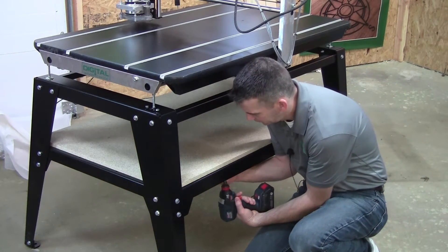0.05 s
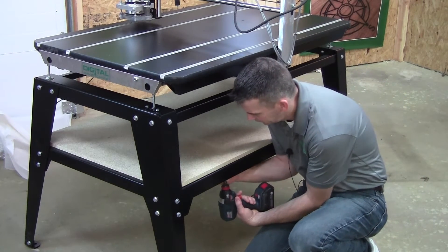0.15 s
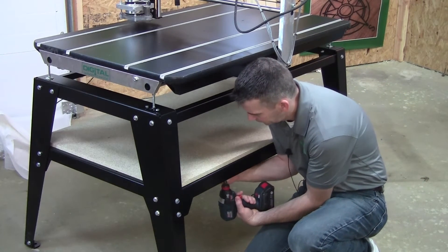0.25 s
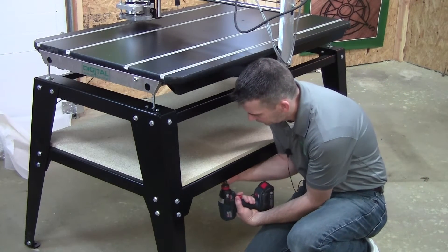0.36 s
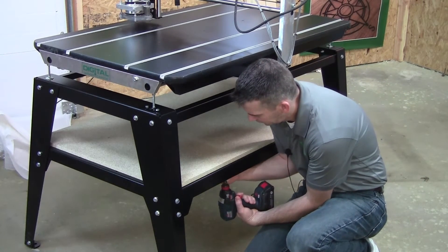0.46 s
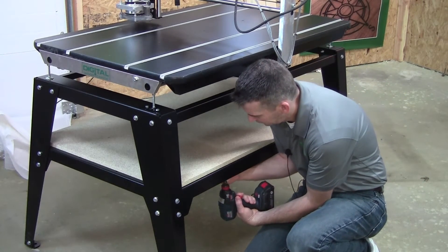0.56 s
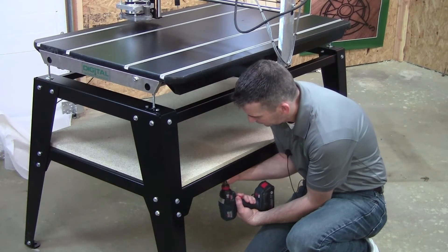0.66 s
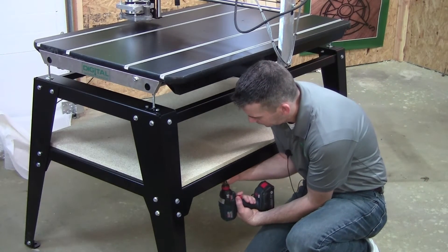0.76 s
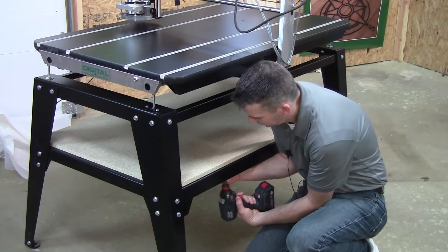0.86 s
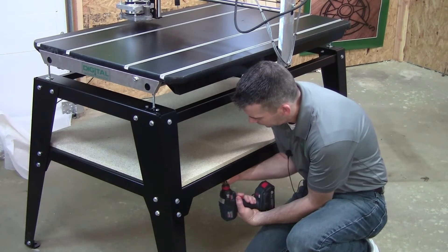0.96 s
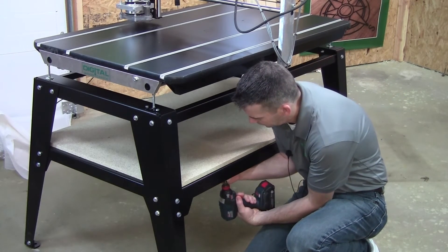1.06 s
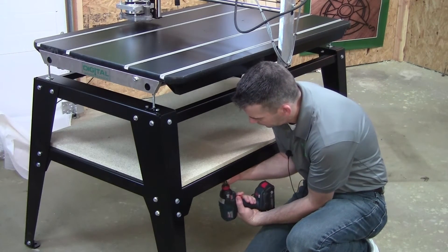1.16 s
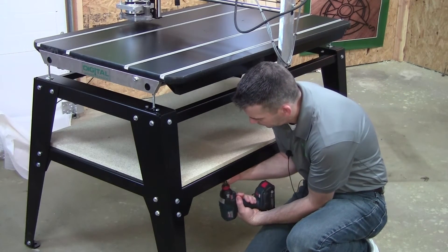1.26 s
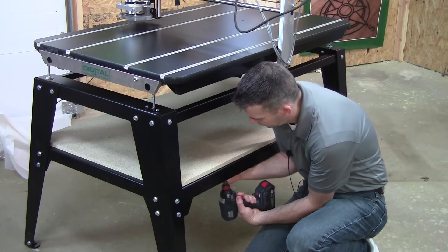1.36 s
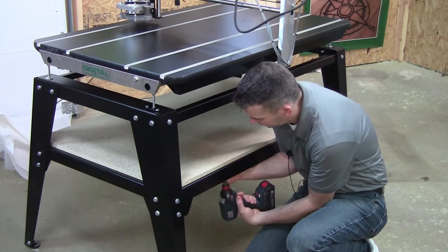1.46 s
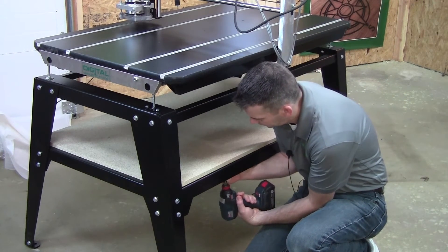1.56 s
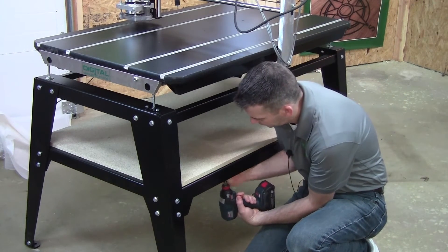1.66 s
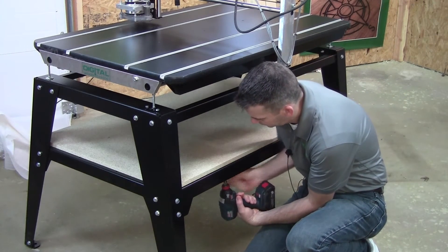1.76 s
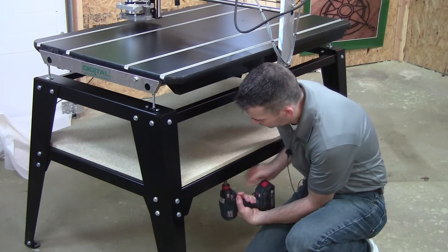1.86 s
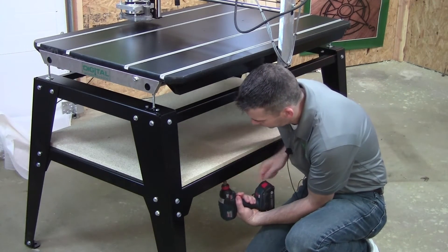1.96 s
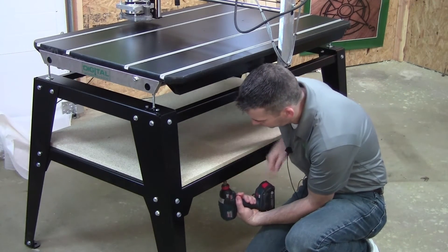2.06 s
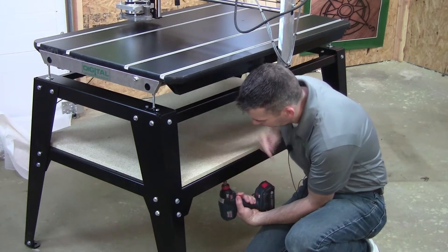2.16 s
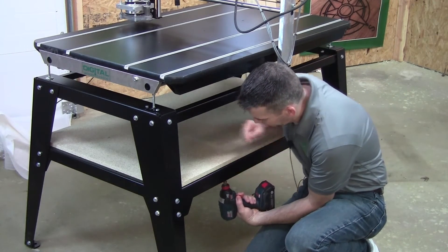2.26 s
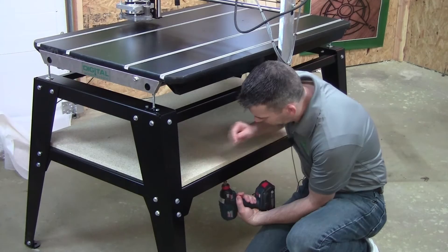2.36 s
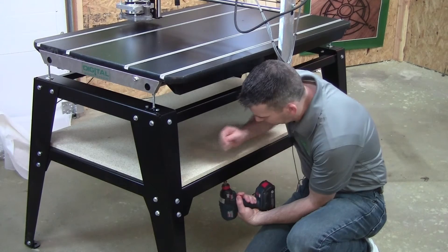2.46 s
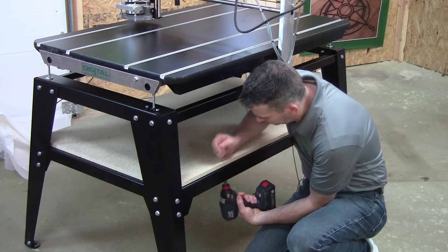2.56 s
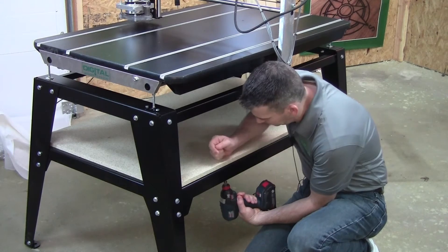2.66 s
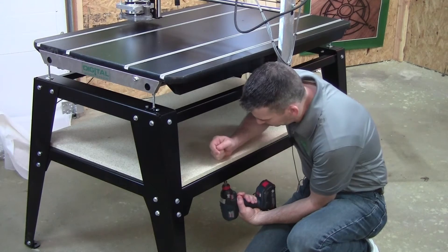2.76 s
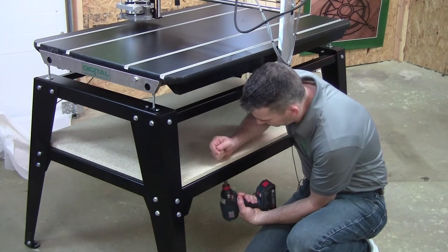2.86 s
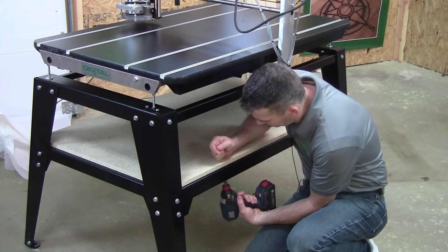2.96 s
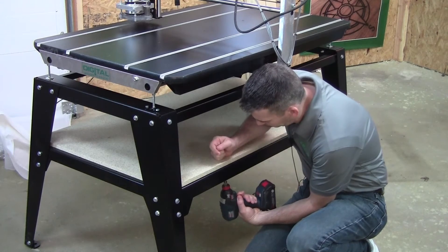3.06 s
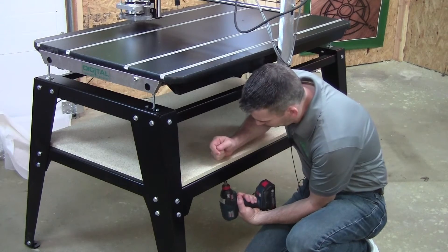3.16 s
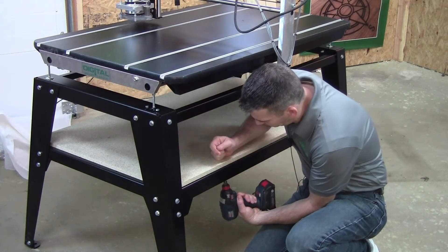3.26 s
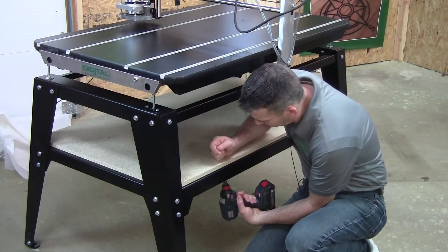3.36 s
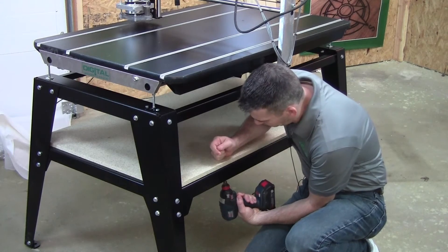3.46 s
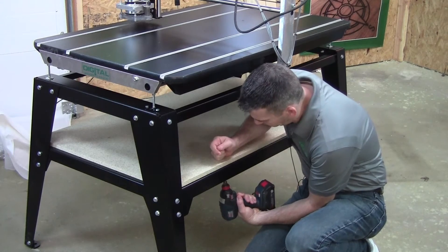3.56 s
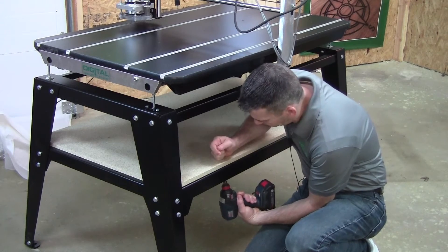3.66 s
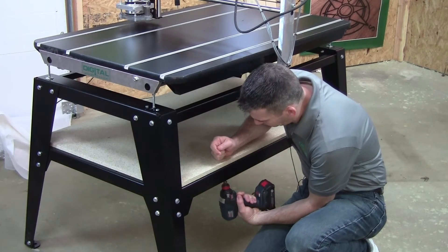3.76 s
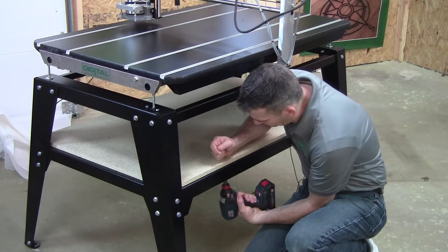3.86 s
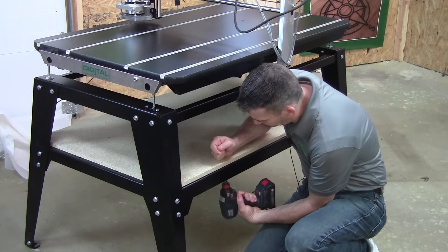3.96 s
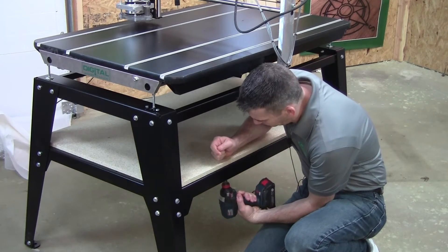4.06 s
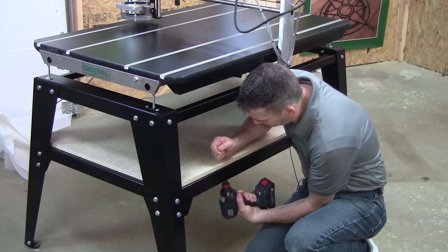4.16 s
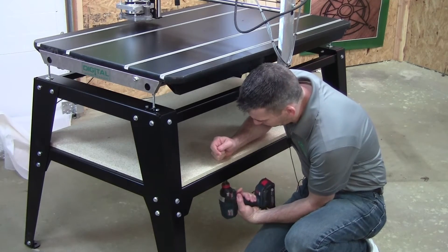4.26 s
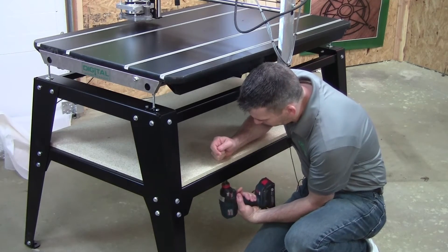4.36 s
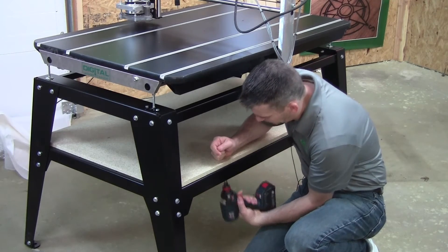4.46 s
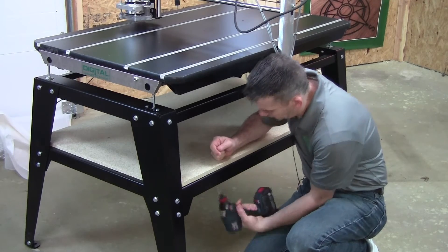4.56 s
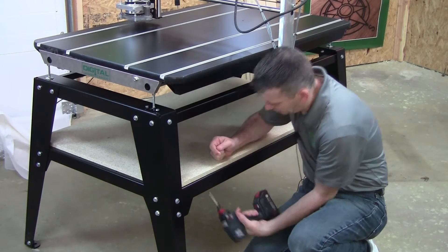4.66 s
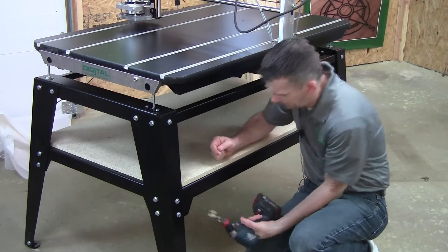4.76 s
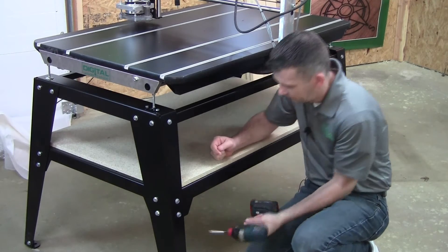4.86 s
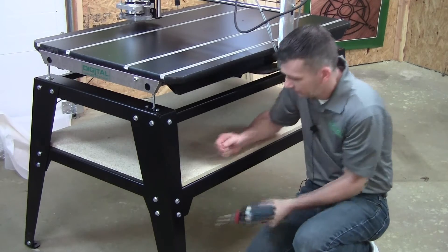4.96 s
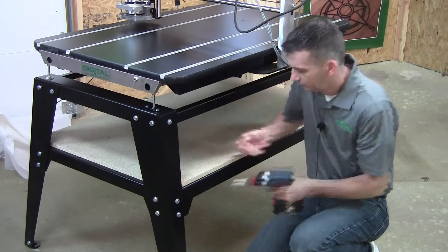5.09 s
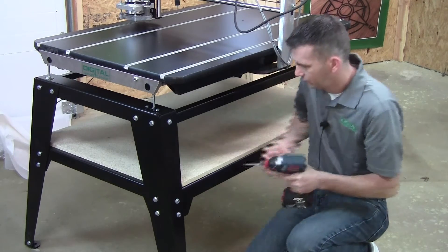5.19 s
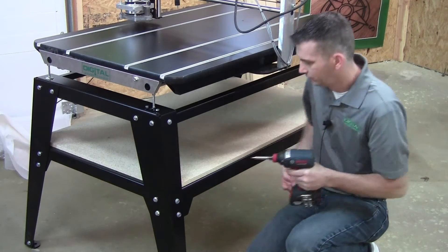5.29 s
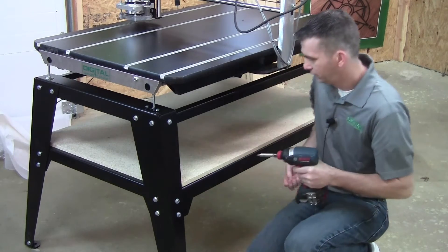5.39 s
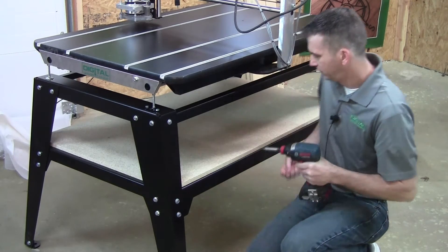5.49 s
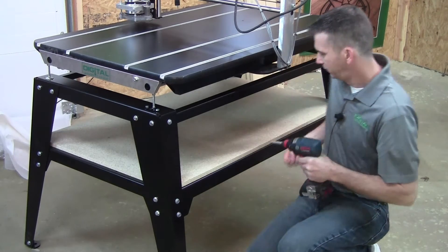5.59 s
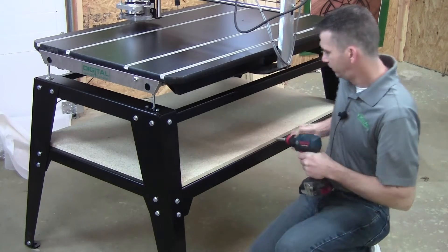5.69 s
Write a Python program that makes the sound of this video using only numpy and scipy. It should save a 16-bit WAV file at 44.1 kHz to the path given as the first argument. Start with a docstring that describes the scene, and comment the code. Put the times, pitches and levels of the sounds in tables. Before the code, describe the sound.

Faint low room air and slight shuffling, then a power driver pulses three times, its gear whine jumping up and stopping quickly. Gritty scraping and dull body bumps fill the gap. Four stronger pulses buzz through board and steel stand, ending in a burst of hard cracks. Clothing rubs and faint clicks remain, heard close up with a modest echo.

```python
"""Low bumps and soft shuffling come first, made of swelling noise over faint air in a hard-floored workshop.
Then a cordless screw gun is pulsed seven times under a plywood shelf on a steel stand: tooth harmonics whine,
noise rattles through the housing and shakes the board's modes, and the last run stalls into hammer blows.
Noise bursts make the knocks and scrapes, paired pulses the dull jolts, bright noise the rubbing cloth.
A clip-on microphone hears it all; a decaying noise tail gives the work its echo."""
import sys
import numpy as np
from scipy import signal
from scipy.fft import rfft, irfft
from scipy.io import wavfile

SR = 44100
rng = np.random.default_rng(int(sys.argv[2]) if len(sys.argv) > 2 else 0)


def log_audio(samples):
    """Write samples as a 16-bit WAV file to the path given in sys.argv[1]."""
    # one column per channel
    frames = np.atleast_2d(samples).T
    # limit to full scale, then quantise
    limited = np.clip(frames, -1, 1)
    pcm = np.round(limited * 32767).astype(np.int16)
    wavfile.write(sys.argv[1], SR, pcm)


N = 252680   # samples

# Air in the room, noise spectrum: f/Hz, density/dB per Hz
AIR_SPECTRUM = [(15, -31), (25, 6), (53, -2.5), (170, -7), (734, -22), (1260, -29.5), (6740, -37.5),
                (9320, -40), (14800, -41.5), (16000, -43)]
# Echo decay of the workshop: f/Hz, t60/s
SHOP_DECAY = [(100, 0.86), (400, 0.49), (2500, 0.36), (8000, 0.28), (16000, 0.068)]
# Low bumps and shudder, noise spectrum: f/Hz, density/dB per Hz
BUMP_SPECTRUM = [(12, -50.5), (20, -1), (80, -5), (134, -9), (255, -19.5), (311, -24), (400, -25.5),
                 (520, -51), (880, -120)]
# Low bumps on the microphone: middle t/s, half length/s, level/dB
THUDS = [(.25, .15, -47.5), (1.97, 0.13, -47.5), (2.35, 0.096, -32.5), (2.65, 0.021, -63),
         (2.76, 0.059, -43), (4.58, 0.043, -54.5), (4.75, 0.3, -45.5), (5.3, 0.096, -37.5),
         (5.5, 0.054, -41.5), (5.73, 0.055, -49.5)]
# Shuffling, noise spectrum: f/Hz, density/dB per Hz
SHUFFLE_SPECTRUM = [(120, -31), (200, -7), (680, -19), (807, -13.5), (971, -20.5), (1150, -23), (2520, -29),
                    (4200, -32), (6000, -39), (7800, -65.5), (13200, -120)]
# Path of the shuffling level: t/s, level/dB
SHUFFLE_LEVEL = [(0, -51), (.25, -61.5), (.63, -74), (1.7, -80), (2.0, -54.5), (2.9, -69), (4.4, -51),
                 (4.8, -58), (5.34, -54.5), (5.73, -64)]
# Cloth, noise spectrum: f/Hz, density/dB per Hz
CLOTH_SPECTRUM = [(2350, -52.5), (4000, -16), (4340, -19.5), (6980, -13), (9720, -3), (14400, -15),
                  (16000, -23)]
# Cloth rubbing: middle t/s, half length/s, level/dB
RUBS = [(.52, 0.0084, -82), (.995, .012, -66), (2.05, 0.048, -60), (2.65, 0.014, -61), (4.59, 0.031, -83),
        (4.795, 0.029, -55), (5.0, 0.11, -60.5), (5.36, 0.023, -67)]
# Dull jolts reaching the microphone: t/s, level/dB
JOLTS = [(.309, -37), (.7063, -18), (1.0395, -30), (1.325, -31), (2.2705, -33), (2.484, -34), (2.671, -28),
         (2.9093, -19), (3.2598, -30), (3.2702, -15), (3.559, -29), (4.1795, -18), (4.2265, -13),
         (4.2385, -15)]
# Bit and screw dragged on the wood: t/s, hiss level/dB, board level/dB
SCRAPES = [(1.856, -27, -35.5), (2.666, -28.5, -30)]
# Metal and plastic knocks: t/s, treble peak level/dB, middle peak level/dB, middle ring f/Hz
KNOCKS = [(0.516, -34.5, -46, 2770), (0.6538, -44, -62.5, 2050), (0.671, -23.5, -25, 2800),
          (0.7059, -7, -10.5, 2850), (0.8452, -27, -13.5, 2800), (1.0394, -18.5, -21, 2760),
          (1.1741, -22, -18.5, 2650), (1.324, -15.5, -19, 2730), (1.4718, -28, -16.5, 3150),
          (1.5023, -33.5, -48, 2260), (1.8424, -39, -47, 2710), (1.8593, -26, -22, 5440),
          (1.8775, -40, -31, 2170), (1.9055, -41, -39, 2630), (2.1463, -47.5, -39, 5270),
          (2.6737, -32, -60, 2450), (2.878, -43, -50, 3530), (2.9006, -29, -24, 4000),
          (2.9098, -14.5, -21, 3220), (3.0421, -23.5, -18, 3170), (3.0523, -42, -24, 3600),
          (3.26, -23, -16, 2880), (3.27, -8.5, -16.5, 2450), (3.3927, -19, -14.5, 3000),
          (3.56, -14.5, -17.5, 3300), (3.8852, -25.5, -34, 2700), (4.1814, -8, -8, 2400),
          (4.194, -6, -7.5, 2130), (4.2178, -3, -3.5, 3300), (4.2391, -3.5, -4.5, 2150),
          (4.528, -41.5, -39, 4750), (4.5778, -24, -35, 3300), (4.6052, -30.5, -40, 5010),
          (4.644, -42, -47.5, 2620), (4.8416, -40, -46, 2390), (5.1953, -41, -66, 2090),
          (5.2475, -45, -68, 1810), (5.2742, -42, -65, 3400), (5.322, -56, -43, 1770),
          (5.3676, -34, -68.5, 2050), (5.443, -46, -56, 2480), (5.494, -50, -46, 4160),
          (5.709, -39, -69, 2360)]
# Grit of the scrapes and body of the knocks: f/Hz, density/dB per Hz
CRACK_SPECTRUM = [(530, -6.5), (900, -17), (1860, -5), (3250, -5), (4250, -10), (7160, -14), (9930, 2.5),
                  (15200, -58.5), (16300, 12)]
# Broad response of plywood and stand: f/Hz, density/dB per Hz
BOARD_SPECTRUM = [(35, -59.5), (60, -31), (135, -2), (165, -4), (200, -3), (237, -7), (334, 5.5), (409, -2),
                  (879, -0.5), (1400, -13.5), (2500, -40), (3250, -106), (5500, -120)]
# Modes standing out of the board: f/Hz, width/Hz, level/dB
BOARD_MODES = [(176, 75, 7.5), (328.5, 19, -1), (850, 22, 0), (1165, 6, 4.5), (1444, 20, -25.5),
               (1857, 4.7, -20)]
# Gear rattle, noise spectrum: f/Hz, density/dB per Hz
RATTLE_SPECTRUM = [(530, -28), (900, -15.5), (1100, -11), (2270, -4.5), (2570, 4), (2730, -14.5),
                   (3300, 1.5), (4520, -11), (7860, -6.5), (8760, -10), (9880, -6), (16000, -10)]
# Stand and shelf under the hammering: f/Hz, density/dB per Hz
CRUNCH_SPECTRUM = [(59, -49.5), (100, -9), (198, -1), (236, -13.5), (332, -8), (444, -17), (518, -3.5),
                   (545, -23), (808, -8.5), (881, -4.5), (1140, -14), (1550, -17), (1660, -20), (3240, -21),
                   (6000, -34.5), (7800, -39), (13200, -120)]
# The screw seats and the tool hammers: t/s, rattle level/dB, board level/dB, crunch level/dB
STALL = [(4.165, -29.5, -36.5, -28), (4.195, -29, -18.5, -18.5), (4.241, -27, -22.5, -13.5),
         (4.281, -42.5, -25, -19.5), (4.34, -75, -26, -38.5)]
# Upper whine, alternate teeth give half steps: multiple of the tooth rate, level/dB
TOOTH_ORDERS = [(2.5, -23), (3, -2), (3.5, -15), (4, -2), (4.5, -15), (5, -3), (5.5, -15), (6, -2),
                (6.5, -11), (7, -5), (8, -4), (8.5, -10), (9, -4), (10, -7), (11, -7), (12, -8), (13, -10)]
# Tone curve of the upper whine: f/Hz, level/dB
WHINE_BODY = [(2600, -15.5), (3600, -0.5), (3850, -12), (4400, 0), (5100, -8), (6100, -13.5), (7200, 0.5),
              (8600, -7), (10000, 5), (12000, -9.5), (15000, -2)]
# Trigger pulls: pull t/s, release t/s, coast/s, top tooth rate f/Hz, spin-up/s, sag/Hz per s (negative gains),
# rattle level/dB, housing ring level/dB, board early level/dB, board late level/dB,
# upper whine level/dB (before a 2.5 dB trim), low tones over tooth rate/ratio,
# first tone level/dB, second tone level/dB
PULLS = [(0.674, 0.85, 0.028, 1271, 0.049, 27, -33, -41.5, -46, -41.5, -38.5, 1.025, -44.5, -35),
         (1.038, 1.175, 0.026, 1302, .037, 34, -33.5, -39, -45.5, -38, -35, 1.02, -47.5, -33),
         (1.328, 1.465, 0.024, 1316, 0.02, -750, -34, -43.5, -45, -41, -42, 1.025, -45.5, -36),
         (2.907, 3.038, 0.029, 1616, 0.042, 599.5, -36, -54.5, -40, -38, -48, 1.02, -65, -42),
         (3.259, 3.387, 0.026, 1408, .037, 32, -30.5, -42.5, -36, -27.5, -31.5, 1.001, -62, -37.5),
         (3.554, 3.74, 0.024, 1713, 0.038, 696, -29, -44.5, -34.5, -27, -38.5, 1.03, -51, -30.5),
         (3.888, 4.152, 0.052, 1343, 0.032, 948, -31, -45, -39.5, -36.5, -30, 1.01, -48, -35.5)]

AIR_DB, SHOP_DB = -51.5, -13.5
THUD_REST_DB, RUB_REST_DB = -64, -73.5   # between the swells
SCRAPE_RISE_S, HISS_T60_S, SCRAPE_BOARD_T60_S = 0.012, 0.14, 0.27
KNOCK_T60_S, LOUD_KNOCK_T60_S = 0.015, 0.04   # base, and what a 0 dB middle adds
KNOCK_SPLIT_HZ = 6150
TICK_HZ, TICK_WIDTH_HZ = 9430, 2300   # the microphone's bright peak
STRUT_HZ, STRUT_DB, STRUT_T60_S = 3660, -1, 1.5
HOUSING_HZ, HOUSING_WIDTH_HZ = 2828, 300
SWITCHING_HZ, SWITCHING_DB = 15900, -18   # speed controller whistle, level against the rattle
SHUDDER_DB, SHUDDER_FOLLOWS = -44, .4   # level with the board at -40.5 dB; share of the board's dB swing
START_RING_DB, START_RING_S = 10, 0.079   # the housing rings hardest as the gears take up
START_KICK_DB, START_KICK_S = 0.5, 0.035   # slight extra board level at the pull
RATTLE_DB_PER_S = -0.5   # while the trigger is held
COAST_LOSS_DB, BOARD_COAST_DB, TONE_COAST_DB = 27, 5.5, 16   # rattle, board and whine lose this over the coast
BRAKE_HZ_PER_S = 12000   # after the release
WHINE_DB_PER_OCTAVE = 22   # the whine grows as the motor spins up
TEETH_PER_TURN, TURN_THROB = 15, .45   # depth of the once-a-turn throb
SING_HZ, SING_WIDTH_HZ, SING_FLOOR_DB = 2598, 390, -17.5   # a shell resonance lifts the second low tone
SING_LIFT_DB, LIFT_HZ = 17, 2850   # upper tones flare as they pass the housing
CUTOFF_HZ, OVERLOAD = 16400, 1.1


def amp(db):
    """Decibels to gain."""
    return 10 ** (np.asarray(db) / 20)


def rms_one(x):
    """Scale to an rms of 1."""
    return x / np.sqrt(np.mean(x ** 2) + 1e-20)


def in_time(rows):
    """Columns of a table, one value a sample."""
    s, *columns = np.transpose(rows)
    return [np.interp(np.arange(N) / SR, s, c) for c in columns]


def at_hz(points, hz):
    """Read a frequency table along a log axis."""
    table_hz, values = np.array(points).T
    return np.interp(np.log(hz + 1), np.log(table_hz), values)


def colour(x, spectrum):
    """Causal (minimum-phase) filter with the given spectrum."""
    cepstrum = irfft(at_hz(spectrum, np.linspace(0, SR / 2, 2049)) * np.log(10) / 20)
    # folding the cepstrum forward puts all the response after the hit
    cepstrum[1:2048] *= 2
    cepstrum[2049:] = 0
    response = irfft(np.exp(rfft(cepstrum)))
    return signal.fftconvolve(x, response)[:len(x)]


def resonate(x, hz, width_hz):
    """Ring one damped mode, unity gain near its peak."""
    r = np.exp(-np.pi * width_hz / SR)
    poles = [1, -2 * r * np.cos(2 * np.pi * hz / SR), r * r]
    return signal.lfilter([(1 - r * r) / 2, 0, (r * r - 1) / 2], poles, x)


def drift(rate):
    """Slow chance wander, spread 1; rate in Hz."""
    r = np.exp(-2 * np.pi * rate / SR)
    wander = signal.lfilter([1], [1, -2 * r, r * r], rng.standard_normal(N + 9000))
    return rms_one(wander[9000:])   # the filter has settled by here


def noise(spectrum, flicker_db, rate):
    """Coloured noise whose level flickers; rms 1."""
    flickering = rng.standard_normal(N) * amp(flicker_db * drift(rate))
    return rms_one(colour(flickering, spectrum))


def swells(rows, rest_db):
    """Bell-shaped swells over a resting level, as gain."""
    t = np.arange(N) / SR
    return amp(rest_db) + sum(amp(db) * np.exp(-((t - s) / half_s) ** 2) for s, half_s, db in rows)


def room_air():
    """Steady air noise, heaviest in the lows, wavering slowly."""
    return amp(AIR_DB) * noise(AIR_SPECTRUM, flicker_db=1.5, rate=3.5)


def workshop(x):
    """Diffuse echo: octave bands of noise, each dying as the decay table says."""
    t, tail = np.arange(SR) / SR, 0
    for hz in 60 * 2. ** np.arange(9):
        edges = [hz / np.sqrt(2), min(hz * np.sqrt(2), .45 * SR)]
        band = signal.butter(2, edges, "band", fs=SR, output="sos")
        tail = tail + signal.sosfilt(band, rng.standard_normal(SR)) * amp(-60 * t / at_hz(SHOP_DECAY, hz))
    tail = tail * np.clip(t / 0.0037 - .4, 0, 1)   # the first walls answer after a few ms
    return signal.fftconvolve(x, tail / np.sqrt(np.sum(tail ** 2)))[:N]


def worker():
    """Low bumps, shuffling and cloth rubbing near the microphone, each a noise with its own swells."""
    bumps = swells(THUDS, THUD_REST_DB) * noise(BUMP_SPECTRUM, flicker_db=6.0, rate=37)
    shuffle = amp(in_time(SHUFFLE_LEVEL)[0]) * noise(SHUFFLE_SPECTRUM, flicker_db=1.0, rate=36)
    cloth = swells(RUBS, RUB_REST_DB) * noise(CLOTH_SPECTRUM, flicker_db=1.5, rate=40)
    return bumps + shuffle + cloth


def jolts():
    """Pushes of air: quick suction, then a slower, weaker rebound."""
    t, clicks = np.arange(4000) / SR, np.zeros(N)
    suction = t / .0009 * np.exp(1 - t / .0009)
    rebound = .3 * t / .003 * np.exp(1 - t / .003)
    s, level_db = np.transpose(JOLTS)
    clicks[np.round(s * SR).astype(int)] = amp(level_db)
    return signal.fftconvolve(clicks, rebound - suction)[:N]


def board(shake):
    """Plywood and stand: a broad response with a few modes standing out; rms 1."""
    modes = 0
    for k, (hz, width_hz, db) in enumerate(BOARD_MODES):
        modes = modes + (-1) ** k * amp(db) * resonate(shake, hz, width_hz)   # alternating sign
    return rms_one(rms_one(colour(shake, BOARD_SPECTRUM)) + 0.69 * rms_one(modes))


def scrapes():
    """Gritty friction hiss with the board sounding under it and dying more slowly."""
    grit, wood, out = noise(CRACK_SPECTRUM, flicker_db=2.0, rate=105), board(rng.standard_normal(N)), 0
    for s, hiss_db, board_db in SCRAPES:
        t = np.arange(N) / SR - s
        rise, fall = np.clip(t / SCRAPE_RISE_S, 0, 1), np.maximum(t - SCRAPE_RISE_S, 0)
        out = out + rise ** 2 * amp(hiss_db - 60 * fall / HISS_T60_S) * grit
        out = out + np.sqrt(rise) * amp(board_db - 60 * fall / SCRAPE_BOARD_T60_S) * wood
    return out


def knocks():
    """Each knock is a dying crack, bright treble over a ringing middle; a steel strut rings after it."""
    cracks, t = np.zeros(N + 4000), np.arange(4000) / SR
    onset = np.minimum(t / .0006, 1)
    high = signal.butter(4, KNOCK_SPLIT_HZ, "high", fs=SR, output="sos")
    low = signal.butter(4, KNOCK_SPLIT_HZ, fs=SR, output="sos")
    for s, treble_db, mid_db, hz in KNOCKS:
        t60_s = KNOCK_T60_S + LOUD_KNOCK_T60_S * amp(mid_db)   # harder knocks last longer
        burst = rng.standard_normal(4000) * onset * amp(-60 * t / t60_s)
        treble = signal.sosfilt(high, 0.28 * burst + resonate(burst, TICK_HZ, TICK_WIDTH_HZ))
        mid = signal.sosfilt(low, colour(burst, CRACK_SPECTRUM)) + 0.9 * resonate(burst, hz, 0.25 * hz)
        at = round(s * SR)
        cracks[at:at + 4000] += amp(treble_db) * treble / np.abs(treble).max()
        cracks[at:at + 4000] += amp(mid_db) * mid / np.abs(mid).max()
    strut_width_hz = np.log(1000) / np.pi / STRUT_T60_S
    strut = amp(STRUT_DB) * resonate(cracks + 1e-18, STRUT_HZ, strut_width_hz)
    return (cracks + strut)[:N]


def stall(rattle, shake):
    """Hammer blows of the seated screw: rattle, board and crunch each follow their own level path."""
    silent = (-120, -120, -120)
    paths = [(STALL[0][0] - .01, *silent)] + STALL + [(STALL[-1][0] + .02, *silent)]
    rattle_gain, board_gain, crunch_gain = amp(in_time(paths))
    crunch = noise(CRUNCH_SPECTRUM, flicker_db=0.5, rate=54)
    return rattle_gain * rattle + board_gain * shake + crunch_gain * crunch


def shell(hz, centre_hz):
    """Resonance curve of the tool's shell, 1 at its centre."""
    return 1 / np.sqrt(1 + (2 * (hz - centre_hz) / SING_WIDTH_HZ) ** 4)


def whine(tooth_hz, whine_db, sharp, first_db, second_db):
    """Tooth harmonics, uneven teeth making each swell and fade on its own, over two low tones."""
    teeth = 2 * np.pi * np.cumsum(tooth_hz * (1 + .002 * drift(130))) / SR
    teeth = teeth + .08 * np.sin(teeth / TEETH_PER_TURN)   # an off-centre pinion runs fast and slow each turn
    upper = 0
    for k, db in TOOTH_ORDERS:
        hz = k * tooth_hz
        level = amp(db + at_hz(WHINE_BODY, hz) + 4.0 * drift(45))
        flare = 1 + amp(SING_LIFT_DB) * shell(hz, LIFT_HZ)
        throb = 1 + TURN_THROB * np.sin(teeth / TEETH_PER_TURN + k * k)   # k * k scatters the phases
        upper = upper + level * flare * throb * np.sin(k * teeth + k * k) * (hz < CUTOFF_HZ)

    low_hz = sharp * tooth_hz
    phase = 2 * np.pi * np.cumsum(low_hz * (1 + 0.002 * drift(60))) / SR
    first = amp(first_db + 2.7 * drift(30)) * np.sin(phase)
    sing = shell(2 * low_hz, SING_HZ) + amp(SING_FLOOR_DB)
    second = sing * amp(second_db + 4.1 * drift(30)) * np.sin(2 * phase)
    return amp(whine_db - 2.5) * upper + np.sqrt(2) * (first + second)


def trigger():
    """Per sample: time since the pull, time held, time since release, share of coast done, pull's columns."""
    t, rows = np.arange(N) / SR, np.array(PULLS)
    current = np.maximum(np.searchsorted(rows[:, 0] - .004, t) - 1, 0)   # each pull takes over 4 ms early
    pull, release, coast, *columns = rows[current].T
    after = np.maximum(t - release, 0)
    return t - pull, release - pull, after, after / coast, columns


def screw_gun():
    """Motor speed drives the whine; gear rattle also rings the housing, and the board shakes with each run."""
    since, held, after, coasted, columns = trigger()
    top_hz, spin_s, sag, rattle_db, ring_db, early_db, late_db, *tones_db = columns
    run = np.maximum(since, 0)
    spin = np.tanh(run / spin_s)
    tooth_hz = np.maximum(top_hz * spin - sag * run - BRAKE_HZ_PER_S * after, 100)
    tool_on = np.clip(1 + since / .0008, 0, 1) * np.clip(1 - (coasted - 1) / .5, 0, 1)
    board_on = np.clip(1 + since / 0.0072, 0, 1) * np.clip(1 - (coasted - 1) / 2.8, 0, 1)

    rattle_db = rattle_db + RATTLE_DB_PER_S * np.minimum(run, held) - COAST_LOSS_DB * coasted
    ring_db = ring_db + START_RING_DB * np.exp(-run / START_RING_S)
    board_db = early_db + (late_db - early_db) * np.minimum(run / held, 1)
    board_db = board_db - BOARD_COAST_DB * np.minimum(coasted, 1) + START_KICK_DB * np.exp(-run / START_KICK_S)
    tones_gain = amp(WHINE_DB_PER_OCTAVE * np.log2(spin + .01) - TONE_COAST_DB * coasted)

    rattle = noise(RATTLE_SPECTRUM, flicker_db=1.5, rate=300)
    ring = resonate(rattle, HOUSING_HZ, HOUSING_WIDTH_HZ)
    ring = rms_one(resonate(ring, HOUSING_HZ, HOUSING_WIDTH_HZ))   # a second pass narrows the ring
    switching = amp(SWITCHING_DB) * rms_one(resonate(rng.standard_normal(N), SWITCHING_HZ, 300))
    shake = board(rng.standard_normal(N) * amp(2.0 * drift(90)))
    shudder = amp(SHUDDER_DB) * noise(BUMP_SPECTRUM, flicker_db=4.0, rate=10)

    tool = whine(tooth_hz, *tones_db) * tones_gain
    tool = tool + amp(rattle_db) * (rattle + switching) + amp(ring_db) * ring
    shaken = amp(board_db) * shake + amp(SHUDDER_FOLLOWS * (board_db + 40.5)) * shudder
    return tool_on * tool + board_on * shaken + stall(rattle, shake)


def scene():
    """The work and its echo, with jolts, worker and air left dry."""
    work = scrapes() + knocks() + screw_gun()
    echo = amp(SHOP_DB) * workshop(work)
    return (room_air() + echo + worker() + jolts() + work)[None]


def record(dry):
    """Peaks are rounded, the top is cut steeply."""
    rounded = OVERLOAD * np.tanh(dry / OVERLOAD)
    return signal.sosfilt(signal.cheby2(14, 70, CUTOFF_HZ, fs=SR, output="sos"), rounded)


dry = scene()
out = record(dry)
log_audio(out)
```